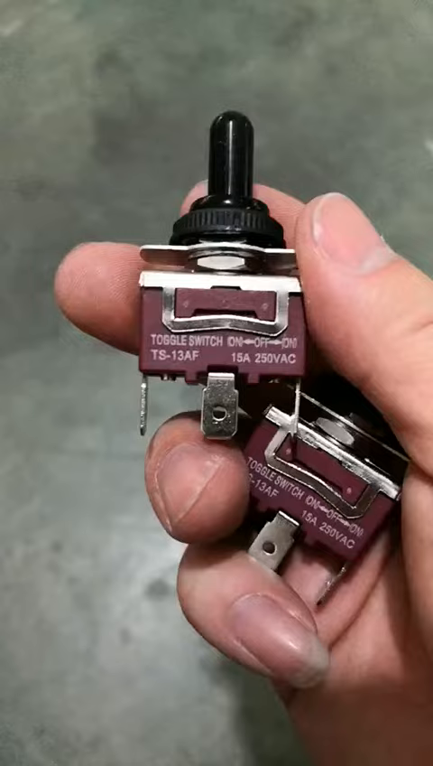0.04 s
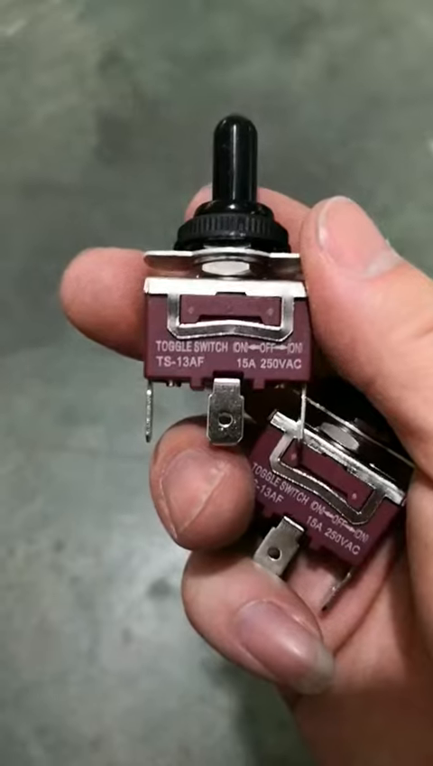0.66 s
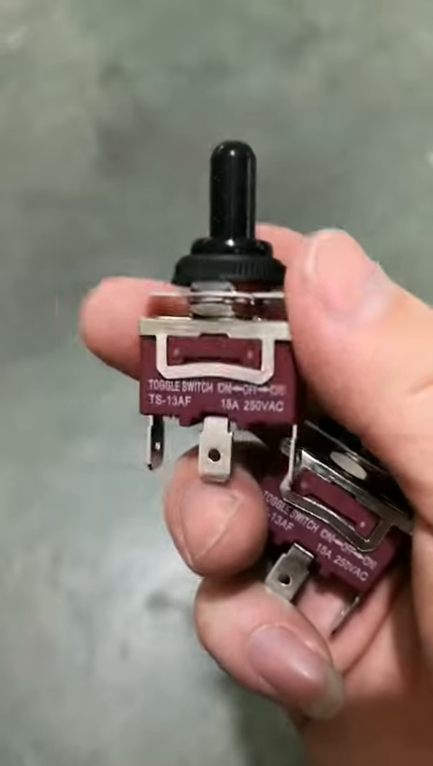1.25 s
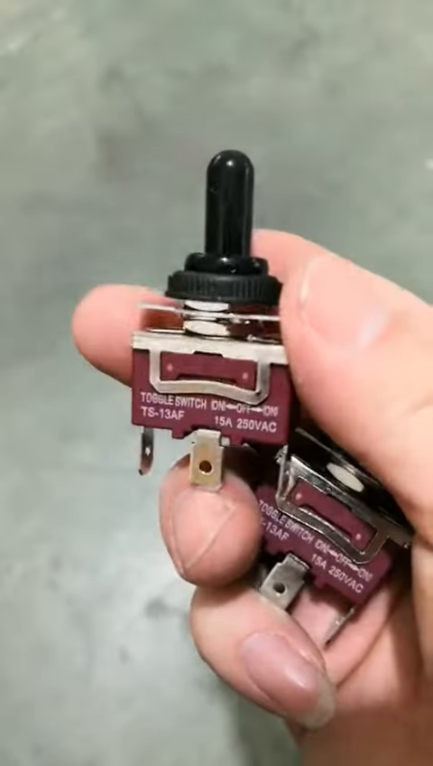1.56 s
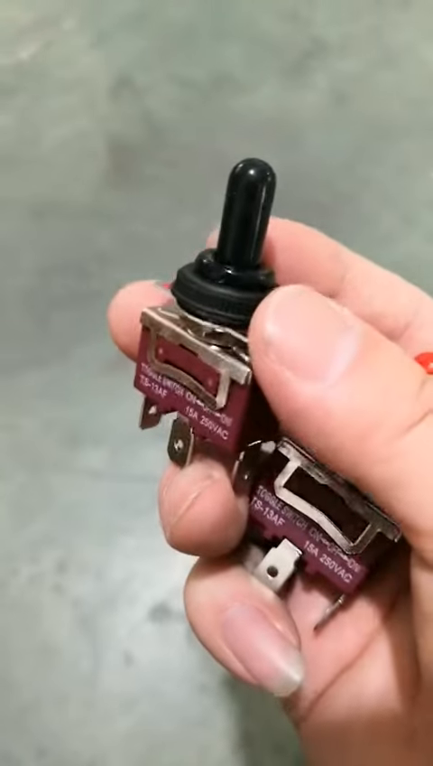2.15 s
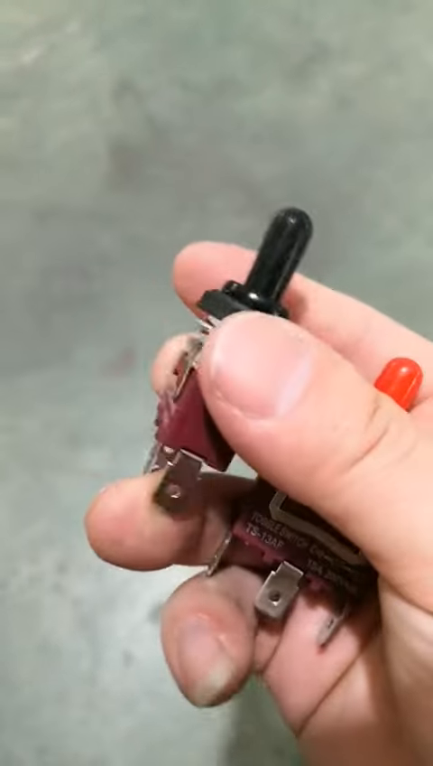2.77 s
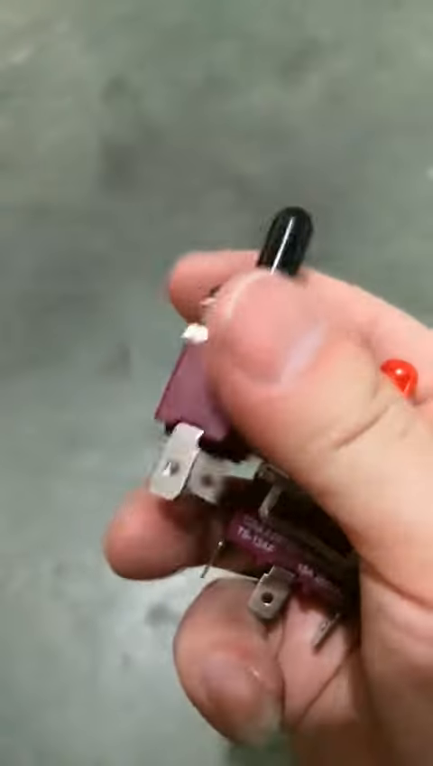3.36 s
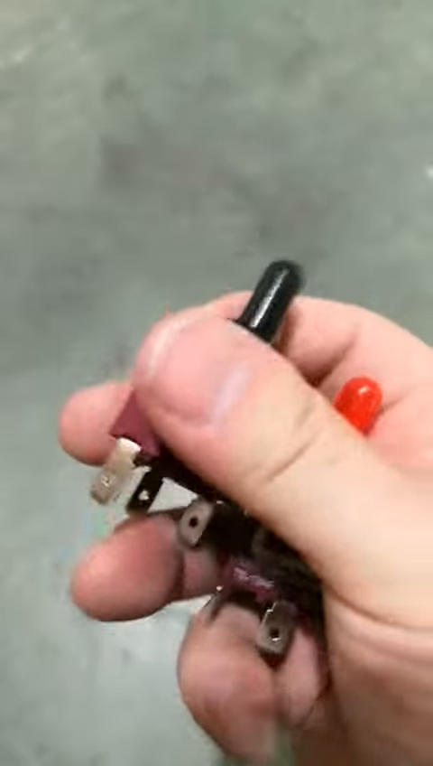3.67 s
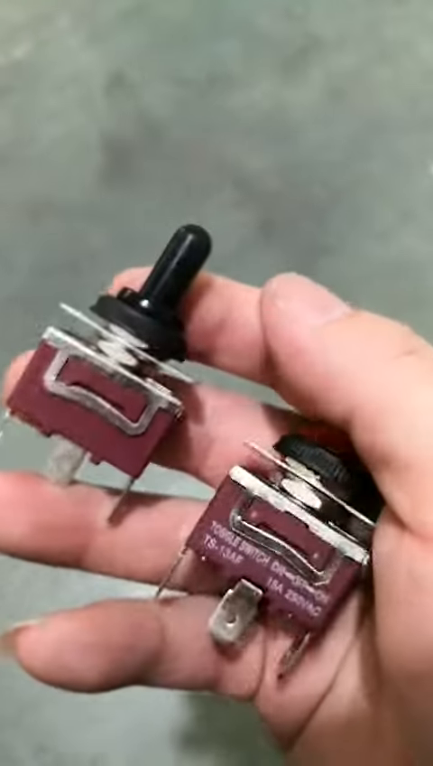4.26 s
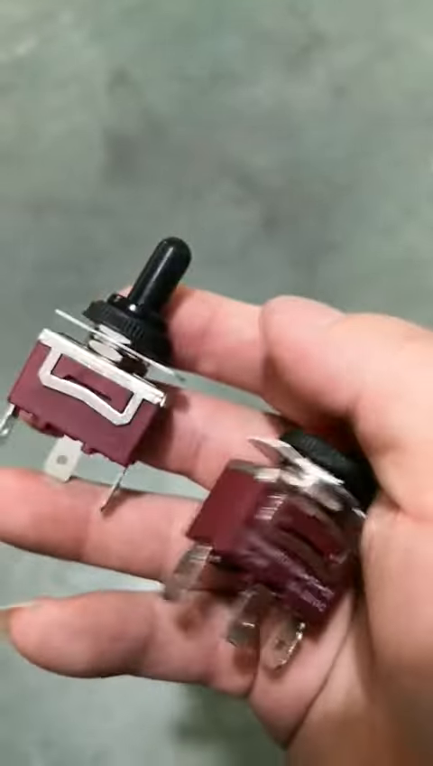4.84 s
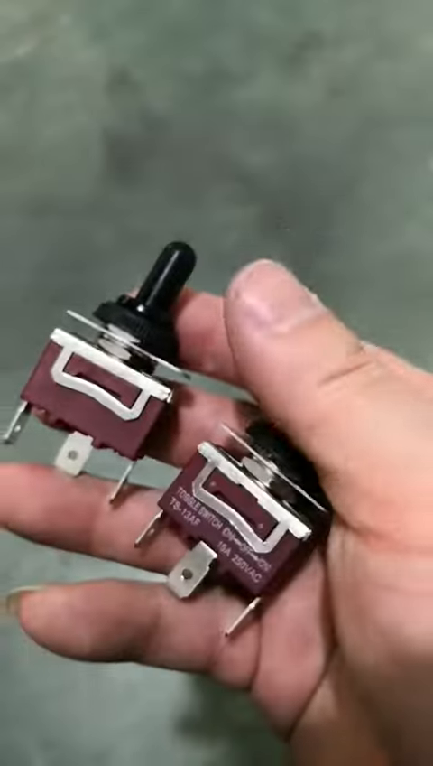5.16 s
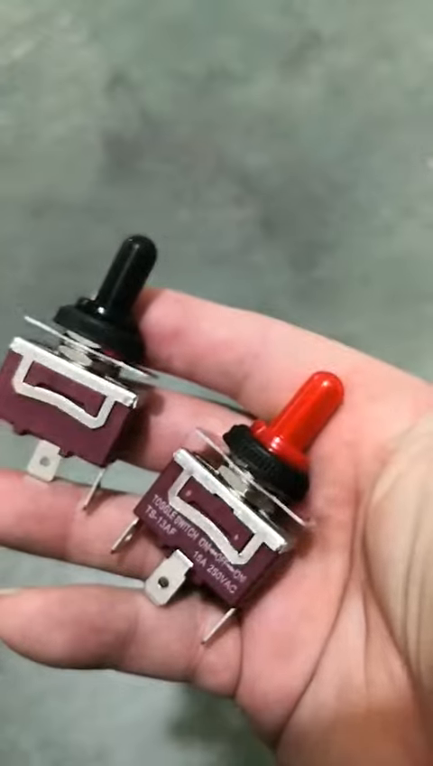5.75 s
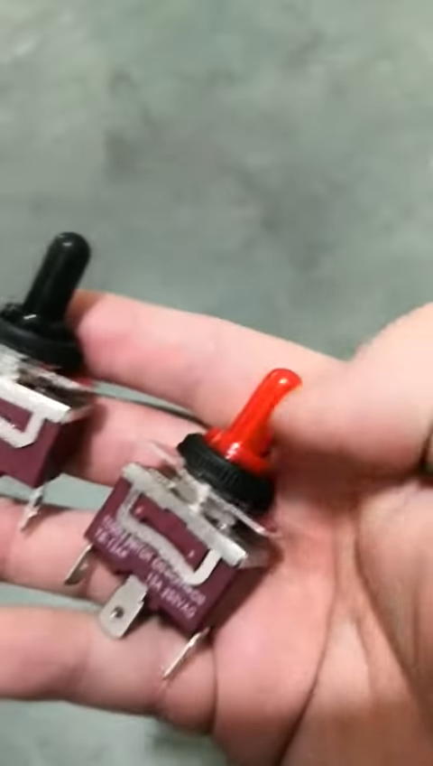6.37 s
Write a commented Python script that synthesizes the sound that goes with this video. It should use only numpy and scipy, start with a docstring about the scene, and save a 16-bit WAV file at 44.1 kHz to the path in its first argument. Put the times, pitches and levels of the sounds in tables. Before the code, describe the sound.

After a brief silence, quiet workshop air noise with a mains hum and a low motor drone comes in at about 0.5 seconds and stays throughout. From 1 second, fingers turn two small toggle switches close to the microphone, making soft, irregular rasps of skin on plastic with a thin metallic hiss. The hollow housings nudge and scrape each other now and then, most busily between 4 and 4.7 seconds. Metal tabs tick and ring faintly at around 1.3, 2.2 and 3.4 to 3.9 seconds. From 5.1 to 5.6 seconds the grip on the microphone slips, giving louder, low rumbling bumps and creaks, ending in one sharp click. A little more rubbing follows. At about 6.25 seconds something heavy lands farther off with a loud bang, which rings through the hard-walled hall until the end.

```python
"""Toggle switches handled in a workshop

Two switches are turned over close to a camera, over air noise, mains hum and a motor.
Fingers slide on the plastic, the housings shove and scrape, the metal tabs clink faintly.
The grip on the camera sticks and slips, rumbling in its shell.
At the end something heavy bangs down farther off and the hard-walled hall rings."""
import sys
import numpy as np
from scipy import signal
from scipy.fft import rfft, irfft, next_fast_len
from scipy.io import wavfile
from scipy.ndimage import uniform_filter1d, map_coordinates

SR = 44100
rng = np.random.default_rng(int(sys.argv[2]) if len(sys.argv) > 2 else 0)


def transcribe(u):
    """Save the signal u as a 16-bit wav file named by the first command-line argument.

    u: samples, shape (n,) or (channels, n), limited to [-1, 1]; the rate is SR.
    q: integer samples, one column per channel.
    """
    v = np.clip(np.atleast_2d(u).T, -1, 1)
    q = np.round(v * 32767).astype(np.int16)
    wavfile.write(sys.argv[1], SR, q)


N = 287091
T = np.arange(N) / SR


def amp(db):
    """Decibels to gain."""
    return 10 ** (np.asarray(db) / 20)


def unit(x):
    """Scale to rms 1."""
    return x / np.sqrt(np.mean(x ** 2) + 1e-20)


def along(points, hz):
    """Interpolate (freq_hz, value) points on a log axis."""
    freqs_hz, values = np.transpose(points)
    return np.interp(np.log(hz + 1), np.log(freqs_hz + 1), values)


def wobble(rate_hz):
    """Smooth random curve through rate_hz knots a second."""
    return map_coordinates(rng.standard_normal(int(N * rate_hz / SR) + 4), [T * rate_hz])


def filtered(x, response):
    """Apply a complex frequency response."""
    size = next_fast_len(N + SR // 2)
    return irfft(rfft(x, size) * response(np.fft.rfftfreq(size, 1 / SR)), size)[..., :N]


def shaped(x, curve):
    """Apply a (freq_hz, gain_db) curve."""
    return filtered(x, lambda hz: amp(along(curve, hz)))


def coloured(x, curve):
    """Shape by a curve, at rms 1."""
    return unit(shaped(x, curve))


def resonant(x, modes):
    """Steep-skirted (freq_hz, width_hz, gain_db) resonances, at rms 1."""
    def response(f):
        return sum(amp(db) * (2j * f * width_hz / (hz * hz - f * f + 2j * f * width_hz)) ** 2
                   for hz, width_hz, db in modes)
    return unit(filtered(x, response))


def noise():
    """Two independent white noises."""
    return rng.standard_normal((2, N))


def grit(rate_hz, share):
    """Friction: tiny random slips carry a share of the power, a soft rush the rest."""
    slips = noise() * (rng.random(N) < rate_hz / SR)
    return np.sqrt(share) * unit(slips) + np.sqrt(1 - share) * noise()


def even(x, samples):
    """Steady push: level out slow swells."""
    return x / np.sqrt(np.abs(uniform_filter1d(x ** 2, samples)) + 1e-6)


def stroke(start_s, rise_s, hold_s, t60_s):
    """Movement envelope: rise, hold, decay."""
    decay_s = np.maximum(T - start_s - rise_s - hold_s, 0)
    return np.clip((T - start_s) / rise_s, 0, 1) * amp(-60 * decay_s / t60_s)


def together(envelopes):
    """Add envelopes in power."""
    return np.sqrt(sum(e ** 2 for e in envelopes))


def ring(modes, t):
    """Decaying modes, fluttered by echoes, at a random phase in each channel."""
    out = 0
    for hz, db, t60_s in modes:
        flutter = amp(2.5 * wobble(26.0)[:len(t)])
        tone = np.sin(2 * np.pi * (hz * t + rng.random((2, 1))))
        out += amp(db - 60 * t / t60_s) * flutter * tone
    return out


def add(track, start_s, sound):
    """Mix a sound in at start_s."""
    span = track[:, round(start_s * SR):][:, :sound.shape[1]]
    span += sound[:, :span.shape[1]]


def workshop():
    """Air noise, a low drone and the unsteady lines of mains and motor."""
    # mains and motor lines: freq_hz, level_db, drift_hz
    lines = [(100, -42, 0.37), (48.8, -54.5, 1.7), (173, -62, 2.45), (1736, -75.5, 7.65),
             (1788, -67.5, 7.06)]
    # room noise spectra: freq_hz, density_db
    air = [(30, -45), (130, -7), (220, -0.5), (400, -2), (510, -11), (630, -11), (880, -6), (1300, -8.5),
           (1800, -7), (2650, -8.5), (3200, -17), (5400, -15.5), (7600, -21), (8600, -33), (15500, -44.5)]
    drone = [(15, -28), (30, 2), (46, -5), (65, 8.5), (110, 7.5), (175, -5.5), (220, -8), (320, -44.5)]
    hum = 0
    for hz, db, drift_hz in lines:
        pitch_hz = hz + drift_hz * np.array([wobble(12), wobble(18)])
        hum += amp(db) * np.sqrt(2) * np.sin(2 * np.pi * np.cumsum(pitch_hz, 1) / SR)
    return hum + amp(-58) * coloured(noise(), air) + amp(-51.5) * coloured(noise(), drone)


def far_bang():
    """A heavy thing lands in quick, ever brighter blows, heard mostly through the hall."""
    # impacts: start_s, level_db, cutoff_hz
    blows = [(6.249, -26, 600), (6.254, -31.5, 2200), (6.263, -30.5, 6200), (6.272, -31.5, 9100),
             (6.286, -28.5, 14000)]
    # impact spectrum: freq_hz, density_db
    crash = [(70, -32), (130, -9), (210, -6), (320, -5.5), (468, -12), (549, -3.5), (650, -10.5),
             (1000, -5.5), (1200, -14), (1800, -10), (2830, -17), (3150, -23.5), (7600, -25.5), (9000, -37),
             (12500, -49), (15500, -63)]
    # hall decay: freq_hz, t60_s
    hall = [(150, 1.35), (1000, 1.23), (4000, 0.92), (8000, 0.85), (15000, 0.65)]
    # modes of the fallen thing: freq_hz, gain_db, t60_s
    modes = [(230, -17, 1.4), (302, -1.5, 1.4), (343, -6, 1.6), (401.5, -0.5, 1), (547, 4, 0.45),
             (686, 0, 0.61), (873, -3, 0.77), (976, -9.5, 0.99), (1200, -10, 0.54), (1554, -7, 1),
             (1714, -12, 1.6), (2040, -8, .8), (2730, -12, 0.59), (2840, -11.5, 0.8)]
    out, t = np.zeros((2, N)), np.arange(SR // 2) / SR
    for start_s, db, cutoff_hz in blows:
        wash = filtered(coloured(noise(), crash), lambda f: 1 / np.sqrt(1 + (f / cutoff_hz) ** 6))
        hz, age_s, frames = signal.stft(wash[:, :len(t)], SR, nperseg=256)
        decay = amp(-60 * age_s / along(hall, hz)[:, None])
        tail = signal.istft(frames * decay, SR, nperseg=256)[1][:, :len(t)]
        add(out, start_s, amp(db) * tail * (1 - np.exp(-t / 0.0023)))  # reflections pile up
    add(out, blows[1][0], amp(-31) * ring(modes, t) * (1 - np.exp(-t / 0.015)))
    return out


def camera_grip():
    """Skin sticks and slips on the camera; its shell booms and creaks."""
    # grip slips: start_s, hold_s, boom_db, creak_db
    slips = [(5.105, 0.022, -40, -39.5), (5.145, 0.041, -23, -34), (5.214, .04, -27.5, -46),
             (5.272, 0.049, -29.5, -32.5), (5.35, 0.027, -29.5, -41), (5.469, 0.031, -39, -26.5),
             (5.519, 0.052, -23.5, -31.5)]
    # shell modes: freq_hz, width_hz, gain_db
    boom_modes = [(114.9, 6.8, 0)]
    creak_modes = [(194.8, 31.4, 6), (262, 65, -10.5), (326, 32, -22)]
    rise_s, t60_s = 0.022, 0.26
    boom = together(amp(db) * stroke(s, rise_s, hold_s, t60_s) for s, hold_s, db, _ in slips)
    creak = together(amp(db) * stroke(s, rise_s, hold_s, t60_s) for s, hold_s, _, db in slips)
    rumble = boom * even(resonant(grit(rate_hz=190, share=0.48), boom_modes), samples=1800)
    rumble += creak * even(resonant(grit(rate_hz=210, share=0.2), creak_modes), samples=1800)
    return shaped(rumble, [(50, -19), (95, -1.5), (380, 0.5), (600, -1.5)])


def click():
    """One sharp click, alike in both channels."""
    start_s, level_db = 5.596, -24
    out, t = np.zeros((2, N)), np.arange(SR // 20) / SR
    add(out, start_s, -amp(level_db) * np.exp(-t / 0.002) * np.array([[1], [0]]))  # mid only
    return out


def housing_shoves():
    """The hollow housings push against each other."""
    # shoves: start_s, rise_s, level_db, pitch_hz
    shoves = [(1.083, 0.024, -49, 387), (1.27, 0.082, -44, 213), (1.325, .012, -38, 388),
              (1.74, .016, -49, 370), (2.165, .04, -46, 184), (2.2, 0.003, -38.5, 270),
              (2.936, 0.024, -52.5, 357), (4.05, 0.038, -56, 240), (4.226, 0.033, -43, 300),
              (4.424, 0.015, -39, 210), (4.458, .022, -47, 387), (5.738, 0.054, -57, 214)]
    # housing response: freq_hz, gain_db
    housing = [(90, -10), (160, 2.5), (450, -6.5), (620, -10), (1000, -12), (2000, -28)]
    rub, out = noise(), 0
    for start_s, rise_s, db, hz in shoves:
        hollow = even(resonant(rub, [(hz, 110, 0), (300, 300, -13)]), samples=2200)
        out += amp(db) * stroke(start_s, rise_s, hold_s=0.065, t60_s=0.46) * hollow
    return shaped(out, housing)


def housing_scrapes():
    """Dry friction drives two housing resonances about an octave apart."""
    # scrapes: start_s, rise_s, hold_s, level_db, pitch_hz, upper_gain_db
    scrapes = [(1.75, .002, 0.11, -49, 1140, -11), (4.042, 0.053, 0.048, -55.5, 1210, -18),
               (4.207, .031, 0.045, -57.5, 950, -12), (4.589, 0.039, 0.08, -48.5, 1166, 6),
               (5.726, 0.017, 0.034, -57, 940, -4)]
    friction, out = grit(rate_hz=450, share=0.37), 0
    for start_s, rise_s, hold_s, db, hz, upper_db in scrapes:
        hollow = resonant(friction, [(hz, 274, 0), (2.025 * hz, 360, upper_db)])
        out += amp(db) * stroke(start_s, rise_s, hold_s, t60_s=0.52) * hollow
    return out


def tab_clinks():
    """Tabs touch with a dry tick; the struck one rings on faintly."""
    # contacts: start_s, tick_db, ring_db, ring_hz
    contacts = [(1.348, -44, -58, 6840), (1.366, -42, -65, 8400), (2.2, -50, -65, 3600),
                (2.224, -56, -62, 5170), (2.293, -58, -59, 7600), (3.367, -39.5, -63, 5050),
                (3.594, -48, -70, 7500), (3.661, -57, -62, 3775), (3.85, -52, -64, 6050)]
    # tick colour: freq_hz, gain_db
    colour = [(800, -25), (1700, 9), (3500, -1), (7600, -1), (9000, -12), (15000, -30)]
    ticks, rings, t = np.zeros((2, N)), np.zeros((2, N)), np.arange(SR) / SR
    tick_t60_s, ring_t60_s = 0.02, 0.8
    for start_s, tick_db, ring_db, hz in contacts:
        add(ticks, start_s, amp(tick_db - 60 * t / tick_t60_s) * rng.standard_normal((2, len(t))))
        add(rings, start_s, ring([(hz, ring_db, ring_t60_s)], t))
    return rings + shaped(ticks, colour)


def metal_edges():
    """Bright friction: plain hiss until a grazed metal part sings in its own modes."""
    # modes of the metal parts: freq_hz, width_hz, gain_db
    plate = [(4050, 230, -11), (5070, 700, -7), (6900, 140, -4), (7120, 90, -0.5), (7700, 340, -4.5),
             (8440, 62, -12), (10900, 1500, -26)]
    bracket = [(3500, 82, -4.5), (4600, 73, -2), (5130, 70, -6.5), (5730, 80, -7), (6040, 100, -4.5),
               (6480, 80, -1), (7260, 150, -1), (7520, 41, 4), (8790, 200, -15.5)]
    terminal = [(2500, 36, -4), (3780, 20, -8.5), (4975, 58, -7), (6300, 60, -20), (7330, 60, -13),
                (7494, 27, -1), (7640, 30, -3.5), (8860, 200, -17.5)]
    # friction spectrum: freq_hz, density_db
    hiss = [(1800, -29), (3400, 0.5), (4200, -3), (5200, 1), (6200, -2.5), (7600, 3), (8500, -6.5),
            (10000, -16.5), (12000, -24.5), (15000, -30)]
    grazes = [(plate, stroke(1.317, rise_s=0.023, hold_s=0.34, t60_s=0.67)),
              (bracket, 0.76 * stroke(2.17, rise_s=0.02, hold_s=0.19, t60_s=1.3)),
              (terminal, 0.54 * stroke(3.37, rise_s=0.005, hold_s=0.36, t60_s=1.6))]
    sing = sum(np.sqrt(share) * resonant(noise(), part) for part, share in grazes)
    hiss_share = np.maximum(1 - sum(share for _, share in grazes), 0)
    return sing + np.sqrt(hiss_share) * coloured(grit(rate_hz=1300, share=0.1), hiss)


def finger_slides():
    """Skin rasps over plastic; metal edges add hiss and fine crackle."""
    # finger strokes: start_s, rise_s, hold_s, rasp_db, hiss_over_rasp_db
    slides = [(1.07, 0.056, .12, -65, -14), (1.257, 0.055, .02, -57.5, -3.5),
              (1.325, 0.026, 0.058, -49.5, 0), (1.748, .03, 0.063, -58, -8), (1.93, 0.12, 0.17, -62.5, -7),
              (2.161, 0.048, 0.085, -49.5, -2), (2.38, 0.071, 0.3, -63, -1), (2.868, 0.05, 0.079, -55, -2),
              (3.04, 0.032, 0.32, -57.5, -1.5), (3.46, 0.16, 0.29, -60.5, 4), (3.847, 0.3, 0.025, -50, -5),
              (4.211, 0.077, 0.052, -48, -4), (4.412, 0.052, 0.11, -53, -3.5),
              (4.591, 0.048, 0.054, -53, 2.5), (4.938, 0.069, .02, -62.5, 0.5),
              (5.103, 0.024, 0.22, -54.5, -7), (5.47, 0.037, 0.1, -52.5, -11),
              (5.748, 0.086, 0.053, -58.5, -6)]
    # friction spectra: freq_hz, density_db
    rasp_spectrum = [(200, -28), (480, -8), (700, -4.5), (1300, -2), (2300, 0), (2750, -2.5), (3200, -9.5),
                     (4500, -13.5), (8000, -63)]
    crackle_spectrum = [(6000, -32), (8200, -2), (9500, -2), (12000, -4), (15000, -8.5)]
    rasp_t60_s, hiss_t60_s = 0.74, 0.63  # decay in the room
    rasp_gain = together(amp(db) * stroke(*timing_s, rasp_t60_s) for *timing_s, db, _ in slides)
    hiss_gain = together(amp(db + over_db) * stroke(*timing_s, hiss_t60_s)
                         for *timing_s, db, over_db in slides)
    crackle = amp(-22) * coloured(grit(rate_hz=300, share=0.7), crackle_spectrum)
    rasp = coloured(grit(rate_hz=1200, share=0.21), rasp_spectrum)
    return rasp_gain * rasp + hiss_gain * (metal_edges() + crackle)


def mic_ports(x):
    """Mid and side to left and right: two close ports hear the bass alike, the treble apart."""
    # likeness of the ports: freq_hz, correlation
    likeness = [(100, .998), (190, .975), (300, .8), (400, .45), (500, -.25), (600, -.5), (800, -.15),
                (1100, .08), (1750, .25), (2400, -.15), (3300, .03), (15000, .03)]
    # port balance: freq_hz, left_minus_right_db
    balance = [(320, 0), (430, -2.5), (630, 4), (950, 0), (1700, 0.5), (3000, 2), (4300, 0), (5800, 3.5),
               (7700, 8), (9500, -0.5)]

    def mid_side_gains(hz):
        angle_rad = np.arccos(np.clip(along(likeness, hz), -1, 1)) / 2
        return np.array([np.cos(angle_rad), np.sin(angle_rad)])
    mid, side = filtered(x, mid_side_gains)
    left_right = np.array([mid + side, mid - side])
    return filtered(left_right, lambda hz: amp(along(balance, hz) * np.array([[0.5], [-0.5]])))


def scene():
    """All sources at the camera."""
    background = workshop()
    switches = finger_slides() + housing_shoves() + housing_scrapes() + tab_clinks()
    return mic_ports(background + switches + camera_grip() + click() + far_bang())


def record(dry):
    """Silence at first, then band-limited sound."""
    start_s, top_hz = 0.452, 15700
    return filtered(dry * (T > start_s), lambda hz: hz < top_hz)


dry = scene()
out = record(dry)
transcribe(out)
```